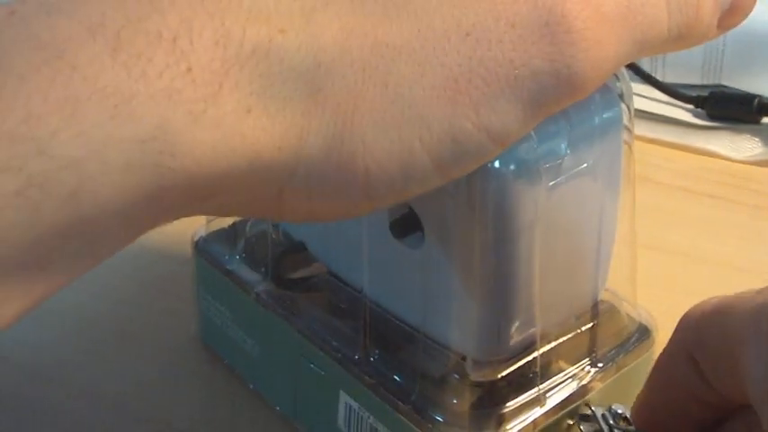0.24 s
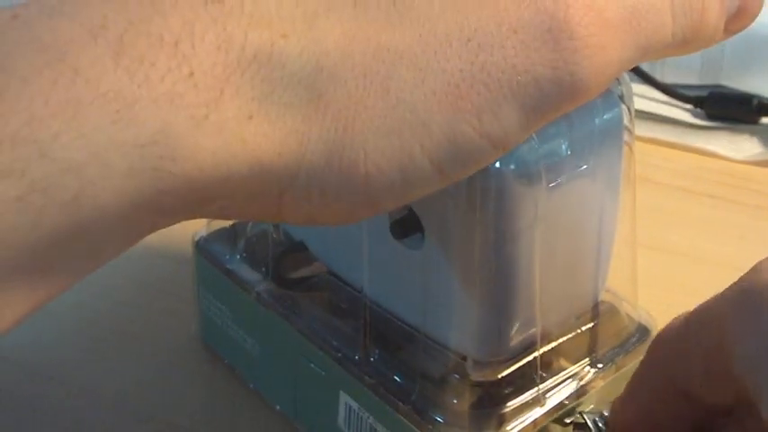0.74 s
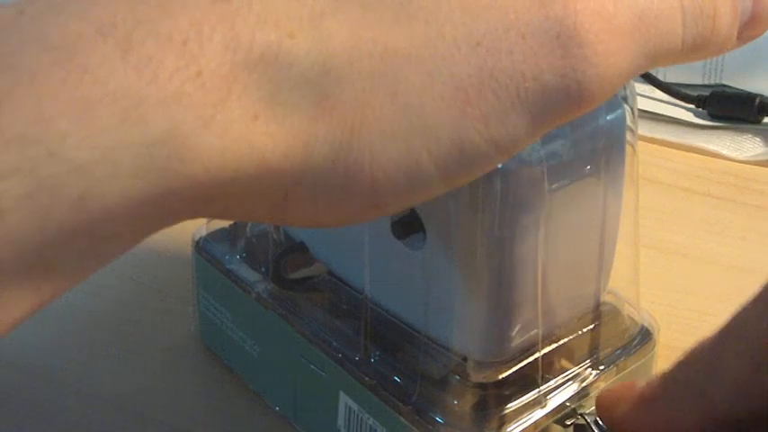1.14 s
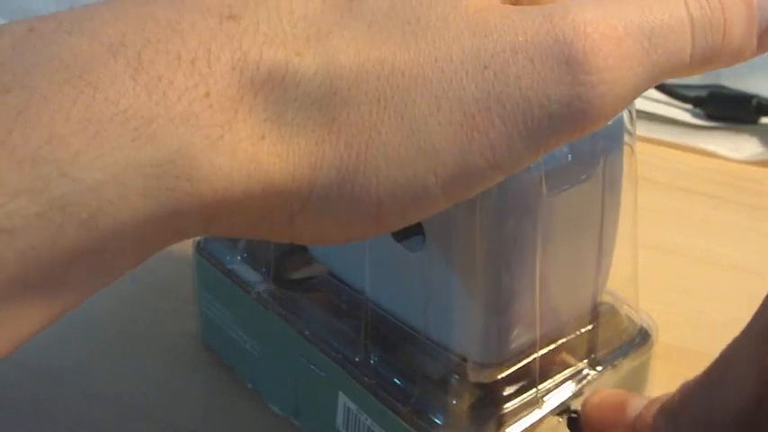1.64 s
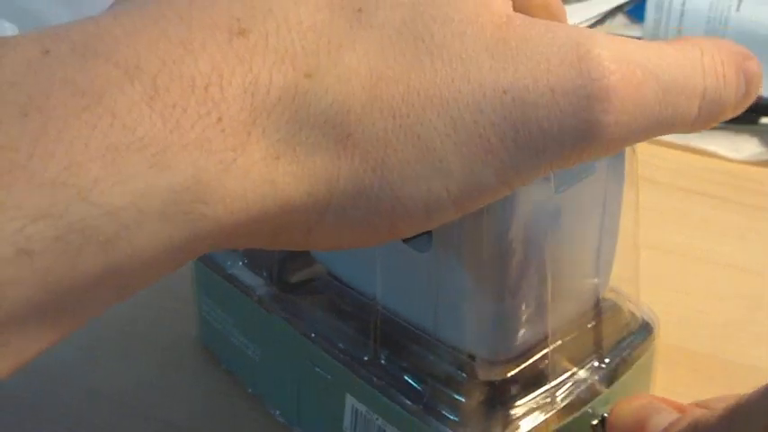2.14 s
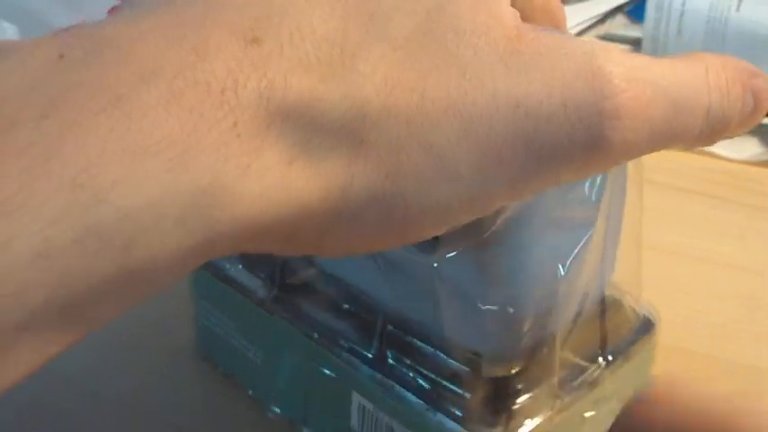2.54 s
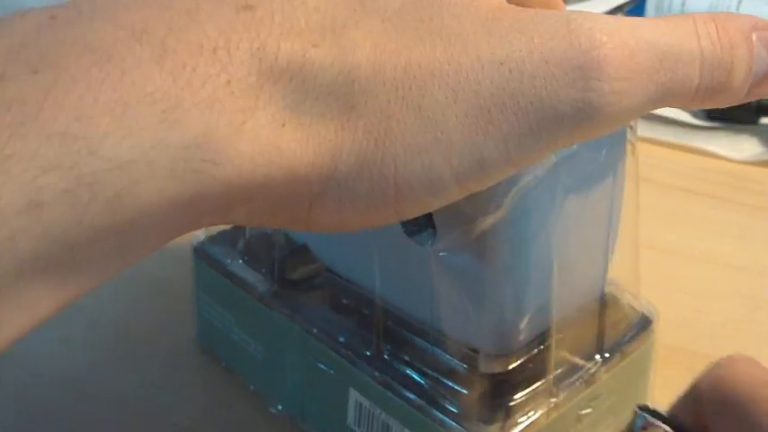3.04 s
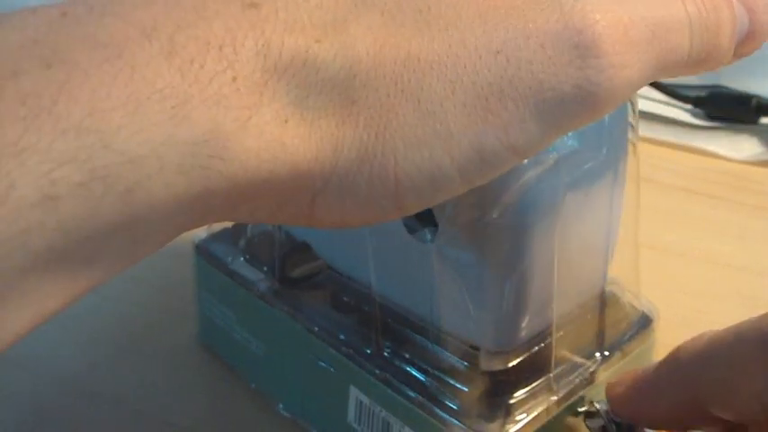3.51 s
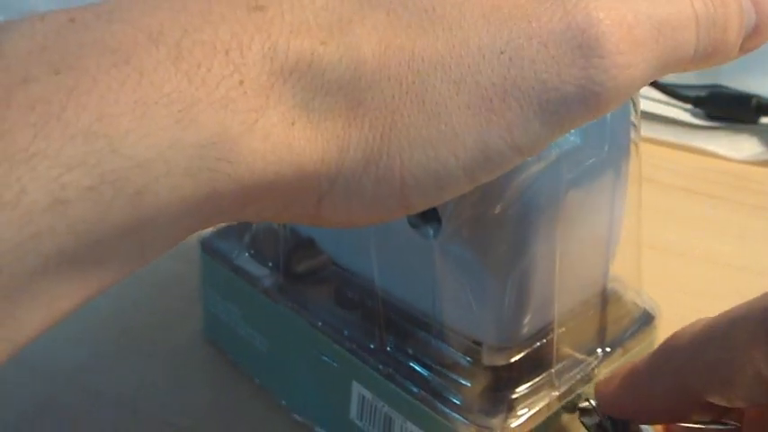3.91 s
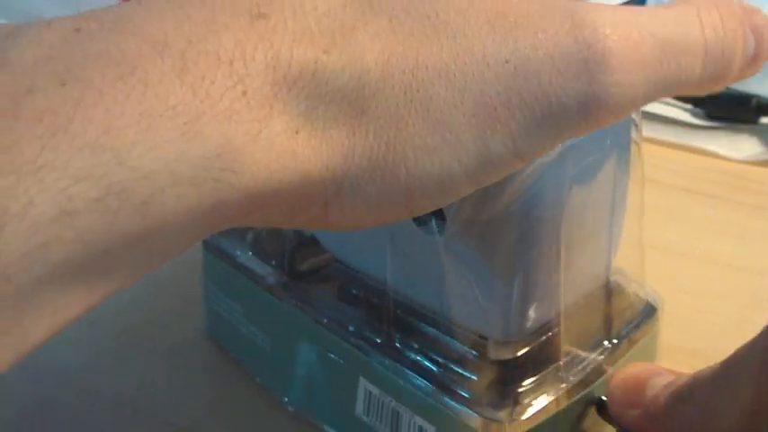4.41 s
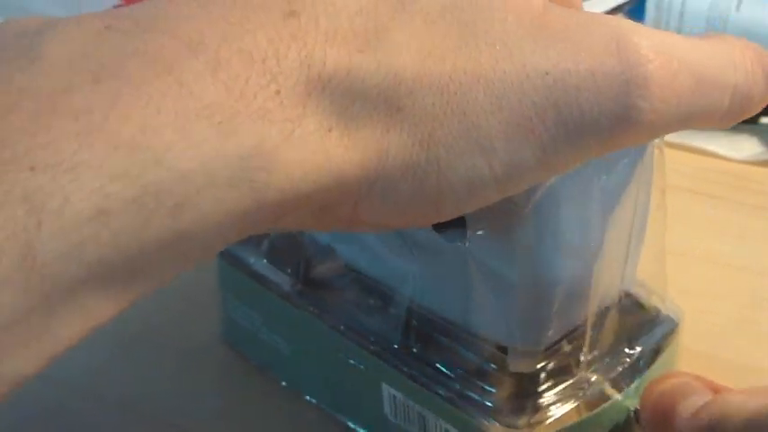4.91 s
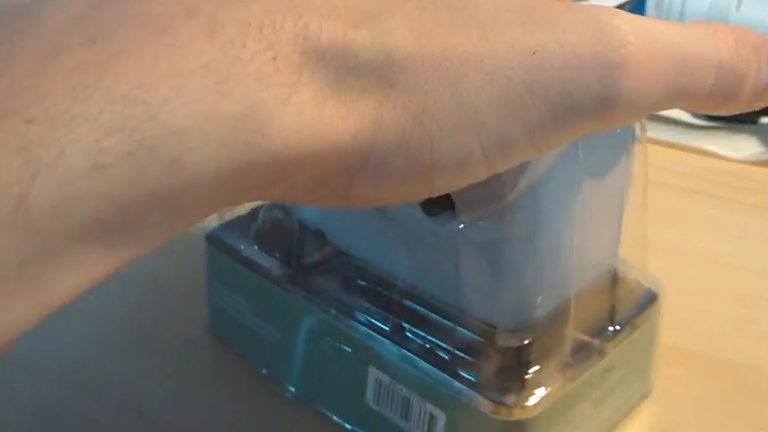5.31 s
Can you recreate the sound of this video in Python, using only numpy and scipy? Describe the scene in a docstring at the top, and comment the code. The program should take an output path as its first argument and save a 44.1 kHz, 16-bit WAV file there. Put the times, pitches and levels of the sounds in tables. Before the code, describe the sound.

Scattered dry plastic ticks and a short box scrape lead to hard snaps as panels buckle and the desk thumps. Crinkles trail off, one isolated crack follows, then near quiet with small rubs before another heavy cluster of cracks and a last pop. Close, slightly dull microphone, short indoor room tail, rumble and mains hum behind.

```python
"""On a wooden desk in a quiet room, a steel nail clipper pries staples from a clear plastic package.
Snaps ring the sheet, its rim and the carton; shoves scuff the box and crinkle the plastic as random slips.
Buckling panels push slow pressure steps, jolts thud the desk, and a short room tail answers.
Shaped noise, a wavering mains hum and a fading airy band lie behind; the loudest peaks overload."""
import sys
import numpy as np
from scipy import signal
from scipy.fft import rfft, irfft, next_fast_len
from scipy.io import wavfile
from scipy.ndimage import map_coordinates

SR = 44100
rng = np.random.default_rng(int(sys.argv[2]) if len(sys.argv) > 2 else 0)


def elevation(decibels):
    """Turn decibel levels (scalar or array-like) into linear amplitude ratios."""
    levels = np.asarray(decibels, float)
    return 10 ** (levels / 20)


def master_out(mix):
    """Clip the mix to full scale and print it as 16-bit PCM to the path in sys.argv[1]."""
    frames = np.transpose(np.atleast_2d(mix))
    ceiling = np.clip(frames, -1, 1)
    pcm = np.round(ceiling * 32767).astype(np.int16)
    wavfile.write(sys.argv[1], SR, pcm)


N = 244741  # length in samples

# resonances of the plastic sheet's panels: centre_hz, width_hz, relative level_db
PANEL_MODES = [(1460, 83, -7.5), (2090, 616, -1.5), (2586, 120, -5.5), (2656, 393, -0.5),
               (3600, 2500, -13.5)]
# resonances of the sheet's stiff rim: centre_hz, width_hz, relative level_db
RIM_MODES = [(3850, 395, -1.5), (4504, 500, 2.3), (5174, 640, 1), (5605, 940, 3), (6120, 4400, -10)]


def unit(x):
    """Scale each row to rms 1."""
    return x / np.sqrt(np.mean(x ** 2, axis=-1, keepdims=True) + 1e-20)


def along(points, hz):
    """Interpolate (Hz, value) points on a log frequency axis."""
    f, v = np.transpose(points)
    return np.interp(np.log(hz + 1), np.log(f + 1), v)


def automation(points):
    """Draw (s, value) points as a line with one value per sample."""
    s, value = np.transpose(points)
    return np.interp(np.arange(N) / SR, s, value)


def wobble(rate):
    """A smooth random curve, rate knots a second."""
    knots = rng.standard_normal(int(N * rate / SR) + 4)
    return map_coordinates(knots, [np.arange(N) * rate / SR])


def filtered(x, response):
    """Filter x by a response given as a function of frequency."""
    n = x.shape[-1]
    padded = next_fast_len(n + 2048)
    spectrum = rfft(x, padded) * response(np.fft.rfftfreq(padded, 1 / SR))
    return irfft(spectrum, padded)[..., :n]


def modes(table, scatter=None):
    """Causal resonances in alternating polarity; scatter (dB) gives each blow its own balance of modes."""
    def response(f):
        total = 0
        for k, (center, width, db) in enumerate(table):
            if scatter is not None:
                db = db + scatter[:, [k]]
            damping = 1j * f * width
            total = total + (-1) ** k * elevation(db) * damping / (center ** 2 - f ** 2 + damping)
        return total
    return response


def grains(rate, spread_db, rub):
    """Random slips of uneven size, rate a second, over a little steady rubbing."""
    happens = rng.random(N) < rate / SR
    size = elevation(spread_db * np.minimum(rng.exponential(size=N), 4))
    slips = happens * size * rng.choice([-1, 1], N)
    return unit(slips) + rub * rng.standard_normal(N)


def struck(s, t60, parts, scatter_db=2, spike=8):
    """A sharp release and a short rattle ring each (modes, dB) part; dB is its energy as rms over 10 ms."""
    size = 3072  # samples per blow
    t = np.arange(size) / SR
    decay = elevation(-60 * t / np.clip(t60, .002, .05)[:, None])
    burst = rng.standard_normal((len(s), size)) * decay
    burst[:, :2] += spike * np.array([1, -1])  # the release
    scatter = scatter_db * rng.standard_normal((len(s), 20))
    sound = 0
    for k, (table, db) in enumerate(parts):
        ring = unit(filtered(burst, modes(table, scatter[:, 5 * k:])))
        sound = sound + elevation(db)[:, None] * ring * np.sqrt(.01 * SR / size)
    where = np.round(s * SR).astype(int)[:, None] + np.arange(size)
    return np.bincount(where.ravel(), sound.ravel(), N + size)[:N]


def air(points):
    """Noise at rms 1, shaped by (Hz, dB per Hz) points."""
    return unit(filtered(rng.standard_normal(N), lambda hz: elevation(along(points, hz))))


def background():
    """Air rumble, hiss and unsteady mains hum rise and fall together with the background level; an airy band
    fades by itself."""
    # background level over time: start_s, level_db
    background_level = [(0, -45.5), (.4, -47.5), (1.8, -48), (2.5, -47.5), (3.1, -48), (3.8, -53.5), (4.3, -54),
                        (5, -46.5), (5.55, -42)]
    # rumble spectrum before levelling: pitch_hz, density_db (per Hz)
    low_air = [(12, -12), (20, 17.5), (108, 16.5), (140, 7.5), (172, -4.5), (204, 1), (234, 4), (300, -2),
               (390, -36.5), (660, -120)]
    # hiss spectrum before levelling: pitch_hz, density_db (per Hz)
    high_air = [(150, -9.5), (250, 6), (388, 6), (417, -3), (487, 3.5), (823, -3.5), (1090, -2.5),
                (1930, 0), (2520, -5), (4650, -4), (7420, -8.5), (9650, -39), (16300, -120)]
    # mains hum partials: pitch_hz, mean peak level_db (re background level)
    hum_partials = [(59.6, -5), (119.2, -10), (179, -11), (240, -13.5), (359, -17)]
    # airy band resonances: centre_hz, width_hz, relative level_db
    airy_modes = [(1480, 300, 0), (2010, 310, 0.023)]
    hiss_db = -6.5  # mean, re background level
    airy_db, airy_fade_db_per_s = -52, 17.5  # level at the start, and its fall

    t = np.arange(N) / SR
    rumble = elevation(2.2 * wobble(7.3)) * air(low_air)
    hum = 0
    for hz, db in hum_partials:
        hum = hum + elevation(db + 1.1 * wobble(2.8)) * np.sin(2 * np.pi * hz * t)
    hiss = elevation(hiss_db + 1.1 * wobble(2.7)) * air(high_air)
    airy = unit(filtered(rng.standard_normal(N), modes(airy_modes)))
    airy = airy * elevation(airy_db - airy_fade_db_per_s * t)
    return elevation(automation(background_level)) * (rumble + hum + hiss) + airy


def handling():
    """The box stick-slips on the desk and tiny creases crackle; shoves rise over the steady grip."""
    # steady grip on the package: start_s, scuff level_db (before the jerks)
    grip_levels = [(0, -59), (.75, -59), (1.05, -63), (1.25, -55), (1.65, -58.5), (1.75, -64.5),
                   (2.15, -53), (2.7, -47), (2.9, -44.5), (3.1, -71), (3.5, -59.5), (3.7, -67),
                   (4.6, -62.5), (4.85, -45.5), (5.3, -56), (5.55, -79.5)]
    # shoves of the hand: start_s, length_s, scuff level_db (before the jerks), crinkle_db (re scuff)
    shove_list = [(1.411, 0.029, -37, -28), (1.481, 0.15, -43, -8), (1.89, 0.012, -55, 2.5),
                  (2.013, 0.06, -26.5, -4), (2.238, 0.055, -51.5, 9.5), (2.412, 0.045, -51.5, 2),
                  (2.465, 0.0083, -36.5, -10), (2.591, 0.11, -44, 1.5), (2.843, 0.067, -54, 6),
                  (3.264, 0.013, -43, -11), (3.35, .03, -53.5, -15), (4.198, 0.049, -47, -11),
                  (4.457, 0.033, -41.5, -8), (4.778, 0.027, -48.5, -9), (4.919, 0.17, -41.5, -7),
                  (5.104, 0.05, -42.5, -9), (5.146, .09, -41, -3.5), (5.421, 0.025, -59.5, -13),
                  (5.506, 0.047, -62, 17)]
    # desktop resonances: centre_hz, width_hz, relative level_db
    desktop_modes = [(368, 69, 13), (848, 120, 19), (1087, 340, 10.5), (1650, 200, -6)]
    attack_db_per_s, release_db_per_s = 1500, 699.5  # how fast a shove swells and dies
    grip_crinkle_db = -8  # panels re scuff while only gripped
    shove_rim_db, grip_rim_db = -2.5, -1  # rim re panel: broad bending is duller than small creasing

    t = np.arange(N) / SR
    grip_db = automation(grip_levels)
    drag = elevation(grip_db)
    bend = elevation(grip_db + grip_crinkle_db)
    edge = elevation(grip_rim_db) * bend
    for s, length, db, crinkle_db in shove_list:
        swell_db = attack_db_per_s * np.clip(s - t, 0, 1)
        fall_db = release_db_per_s * np.clip(t - s - length, 0, 1)
        shove = elevation(db - swell_db - fall_db)
        drag = drag + shove
        bend = bend + elevation(crinkle_db) * shove
        edge = edge + elevation(crinkle_db + shove_rim_db) * shove

    scuff = unit(filtered(grains(500, spread_db=3, rub=.4), modes(desktop_modes)))
    creases = grains(1500, spread_db=3, rub=.3)
    panel = bend * unit(filtered(creases, modes(PANEL_MODES)))
    rim = edge * unit(filtered(creases, modes(RIM_MODES)))
    jerks_db = 3.5 * wobble(90)
    return elevation(jerks_db) * (drag * scuff + panel + rim)


def snaps():
    """Each snap of sheet and clipper rings panel, rim and carton in its own balance."""
    # snaps: start_s, panel level_db, rim_db (re panel), carton_db (re panel), rattle t60_s
    blow_list = [(0.7868, -38, -12, 3, 0.048), (0.7919, -28, -1, -5.5, 0.011), (1.0659, -27, -3, -6, 0.021),
                 (1.169, -26, -2.5, -9.5, .011), (1.1992, -43.5, -27, -1.5, 0.043),
                 (1.3905, -27.5, -1.5, -5, 0.019), (1.4378, -28.5, -1, -8, 0.0083),
                 (1.47, -30, -4, -7.5, 0.018), (1.5061, -42, 0.5, -1.5, 0.018),
                 (1.5327, -29, -4.5, -8, .023), (1.6166, -26.5, -6.5, -15, .019),
                 (1.637, -40.5, -1, -12, 0.0058), (1.665, -38.5, 3, -7.5, 0.028),
                 (1.8784, -37.5, -4.5, -7, 0.0076), (1.901, -43.5, -2, -4.5, 0.0068),
                 (1.92, -46, -7, -15, 0.0062), (1.9292, -39.5, -5, -20, 0.013),
                 (1.9961, -48, 18.5, -4.5, 0.0053), (2.1869, -50.5, -2.5, 7.5, .03),
                 (2.204, -35, -0.5, -7, 0.026), (2.241, -40, 6.5, 0, .023), (2.2488, -33.5, 4, 14, .015),
                 (2.2509, -14, -6, -1.5, .012), (2.274, -22.5, -2.5, -7, 0.029),
                 (2.2895, -38, 5, 4.5, 0.019), (2.2978, -47, 7, 5.5, .02), (2.3585, -40.5, -7, 4, 0.031),
                 (2.413, -42, 7, -5, .008), (2.4651, -38.5, 0, 5.5, 0.033), (2.4768, -31, -4, -7.5, .012),
                 (2.4997, -40.5, 9, -10.5, 0.01), (2.593, -51.5, 5, 9, .015),
                 (2.6014, -18.5, 4.5, 3.5, 0.044), (2.697, -38.5, 3, -10, .013), (2.719, -32, 4, -1, 0.011),
                 (2.735, -33.5, 7, -17, 0.015), (2.782, -31, 6, -3.5, 0.018), (2.8227, -27, 8.5, -11, .021),
                 (2.8291, -13, -8, -13.5, 0.012), (2.8614, -32, 6, 4.5, .016),
                 (2.9243, -16.5, -1, -13, 0.016), (3.0379, -30.5, 7, 4.5, 0.048),
                 (3.0493, -44.5, 16.5, -13.5, 0.0063), (3.1461, -46.5, 7, -3, 0.015),
                 (3.1743, -35, 8.5, -0.5, .011), (3.1925, -43, 5.5, -2, 0.011),
                 (3.2173, -49, 6, -8, 0.0091), (3.2333, -51, 11.5, 2, 0.009),
                 (3.2598, -60, 18.5, 25, 0.032), (3.3222, -42.5, -14, 2, 0.02),
                 (3.3628, -60, 8.5, 18.5, 0.024), (3.429, -47, 8, -3.5, 0.027),
                 (3.454, -42, -15.5, 1.5, 0.01), (3.4755, -38, 1.5, -8, 0.015),
                 (3.5962, -38, 2.5, -5.5, .03), (3.5995, -13.5, -5, -5, 0.014), (3.6846, -42, -8, 0, 0.031),
                 (3.894, -45.5, -13.5, 4, .01), (4.474, -40, 2.5, -5, 0.033), (4.5227, -39.5, 5, -7, .02),
                 (4.7057, -37, -13.5, 1, 0.0041), (4.7569, -14.5, -0.5, -7, 0.013),
                 (4.7913, -23, -5, -10.5, 0.024), (4.7991, -26, -8.5, 1, .025),
                 (4.8919, -34, 4.5, -4.5, 0.026), (4.9052, -38.5, -2, 2.5, 0.012),
                 (4.919, -55.5, -0.5, 2.5, 0.0025), (4.9365, -50, 12.5, -7, 0.013),
                 (4.953, -40, 0.5, -11, 0.0098), (4.967, -34.5, 5.5, -10, .047),
                 (4.994, -31.5, -2.5, -0.5, .02), (5.0248, -36, 5, -4, 0.031),
                 (5.0371, -37.5, 8.5, 6, 0.0099), (5.0542, -33.5, 2, 1.5, .027), (5.0713, -27, 5, -1, .011),
                 (5.0895, -14, -6.5, -0.5, 0.019), (5.1019, -11, -2.5, -4, .02), (5.1115, -29, 5, 8, 0.017),
                 (5.1942, -47, 3.5, 2.5, 0.014), (5.211, -41.5, 4, -1.5, 0.0071),
                 (5.2229, -46, 12, 9.5, 0.025), (5.2306, -38, 12, -8.5, 0.009),
                 (5.3213, -42, 15, -6.5, 0.014), (5.3355, -40, 15, -8, 0.012),
                 (5.355, -41, 10.5, -2.5, .007), (5.3669, -39, 6.5, -8, .027),
                 (5.374, -33.5, 5, -9.5, 0.042), (5.4216, -31.5, 4.5, 6, 0.029), (5.4315, -39, 11, -2, .01),
                 (5.4945, -53.5, 22, 16.5, 0.032), (5.5032, -31, 1.5, 0, .011),
                 (5.517, -19.5, -7, -2, 0.017)]
    # carton resonances: centre_hz, width_hz, relative level_db
    carton_modes = [(713, 250, 4.5), (911, 96, 5), (1000, 46, 5), (1316, 37, -10.5)]
    s, db, rim_db, carton_db, t60 = np.transpose(blow_list)
    parts = [(PANEL_MODES, db), (RIM_MODES, db + rim_db), (carton_modes, db + carton_db)]
    return struck(s, t60, parts)


def buckles(rise=.003, leak=.03):
    """Panels buckle in or pop out; each pressure step leaks away through the microphone's low cut."""
    # panel buckles: start_s, signed peak pressure (full scale 1)
    pop_list = [(0.792, -0.035), (1.063, 0.028), (1.168, -0.031), (1.47, 0.025), (1.614, -0.038),
                (2.007, 0.031), (2.249, -0.12), (2.603, -0.15), (2.721, 0.04), (2.83, -0.08),
                (3.597, -0.053), (4.752, -0.056), (4.964, 0.039), (5.034, 0.051), (5.066, -0.091),
                (5.086, -0.14), (5.098, -0.154), (5.129, 0.062), (5.336, 0.049), (5.424, 0.093),
                (5.518, -0.044)]
    steps = np.zeros(N)
    for s, size in pop_list:
        steps[round(s * SR)] += size
    t = np.arange(SR // 4) / SR
    shape = np.exp(-t / leak) - np.exp(-t / rise)  # time constants in s
    return signal.fftconvolve(steps, shape / shape.max())[:N]


def knocks():
    """The desk thuds under the jolted box, ringing its low resonances."""
    # jolts of the box against the desk: start_s, level_db
    jolt_list = [(0.7941, -31), (1.0654, -31.5), (1.1695, -30.5), (1.3913, -31), (1.4376, -34.5),
                 (1.47, -35.5), (1.532, -32.5), (1.6153, -32), (2.204, -35.5), (2.24, -40.5),
                 (2.2485, -19.5), (2.274, -30), (2.4646, -36), (2.4778, -34), (2.6035, -24), (2.718, -41),
                 (2.736, -34.5), (2.781, -36), (2.8213, -33), (2.8279, -18.5), (2.8595, -41.5),
                 (2.9243, -19.5), (3.0392, -27.5), (3.1769, -39), (3.201, -35.5), (3.5994, -35.5),
                 (4.225, -53), (4.466, -36.5), (4.5436, -45), (4.7569, -26.5), (4.7972, -40), (4.994, -33),
                 (5.0265, -39.5), (5.0727, -38), (5.0878, -28), (5.1003, -19.5), (5.1108, -17),
                 (5.2316, -35), (5.4218, -27.5), (5.4315, -24.5), (5.5014, -31.5), (5.5178, -22)]
    # desk thud resonances: centre_hz, width_hz, relative level_db
    thud_modes = [(120, 71, -5.5), (227, 115, 0), (379, 85, 2), (470, 270, -18)]
    s, db = np.transpose(jolt_list)
    rattle_t60_s = 0.025
    return struck(s, np.full(len(s), rattle_t60_s), [(thud_modes, db)])


def room(x):
    """The walls answer; each quarter second hears a new noise tail, dying by band."""
    # room decay: pitch_hz, t60_s
    decay_times = [(150, 0.1), (500, 0.34), (1500, 0.29), (4000, 0.19), (7000, 0.19)]
    wet, step = np.zeros(N + 2 * SR), SR // 4
    delay = 180  # samples before the walls answer, about 4 ms
    for a in range(0, N, step):
        hz, t, z = signal.stft(rng.standard_normal(SR // 3), SR, nperseg=256)
        decay = elevation(-60 * t / along(decay_times, hz)[:, None])
        tail = signal.istft(z * decay, SR, nperseg=256)[1]
        answer = signal.fftconvolve(x[a:a + step], tail / np.linalg.norm(tail))
        wet[a + delay:][:len(answer)] += answer
    return wet[:N]


def scene():
    """Package and desk near the microphone, with the room's answer, buckles and background."""
    near = snaps() + knocks() + handling()
    mix = near + elevation(-16.5) * room(near) + buckles() + background()
    return mix[None]


def low_pass(x):
    """Removes everything above the highest recorded frequency."""
    return signal.sosfilt(signal.butter(12, 7570, fs=SR, output="sos"), x)


def record(dry):
    """A steep band limit near 7 kHz, then hard overload at full scale."""
    band_limit = signal.cheby1(7, .5, 6700, fs=SR, output="sos")  # order, ripple dB, edge Hz
    limited = signal.sosfilt(band_limit, dry)
    overloaded = np.clip(limited, -1, 1)
    return low_pass(overloaded)


dry = scene()
out = record(dry)
master_out(out)
```